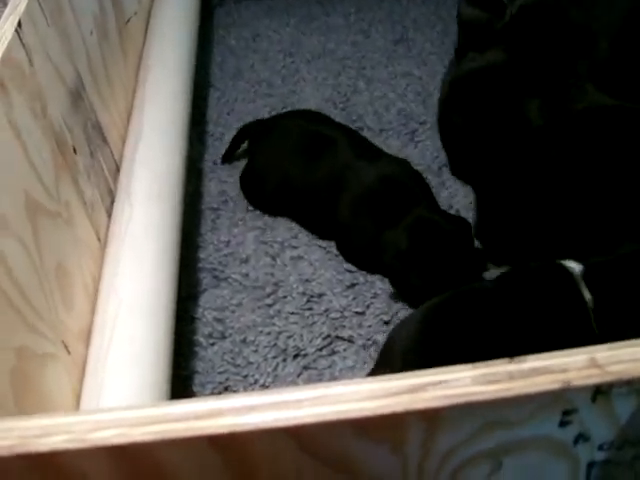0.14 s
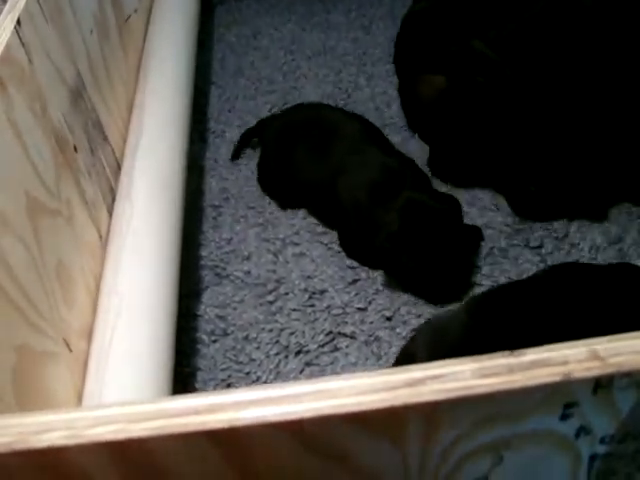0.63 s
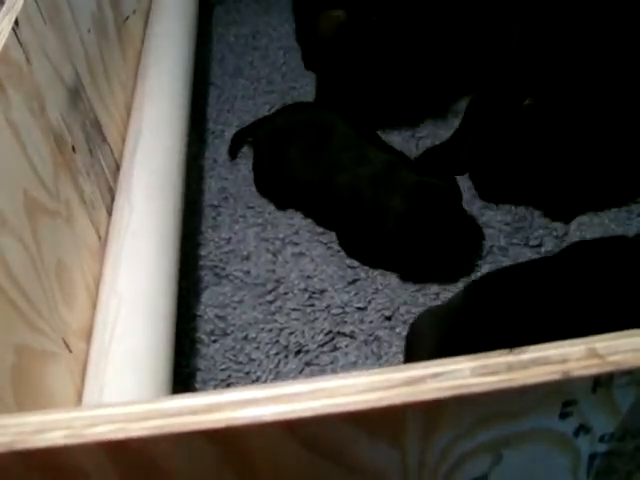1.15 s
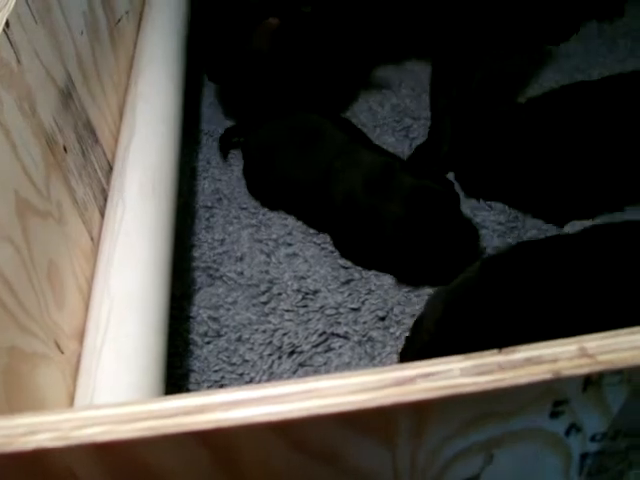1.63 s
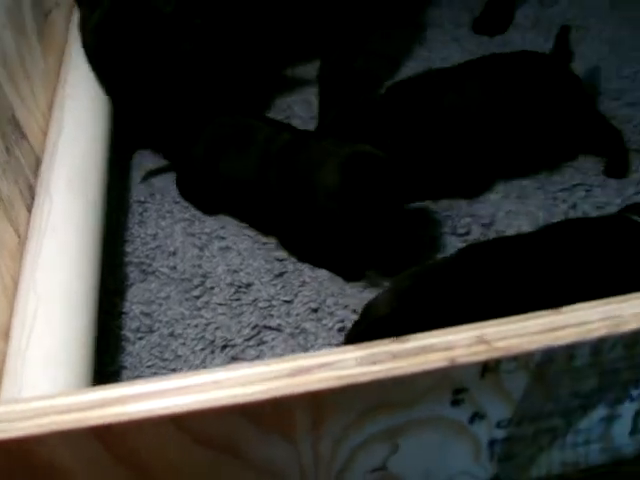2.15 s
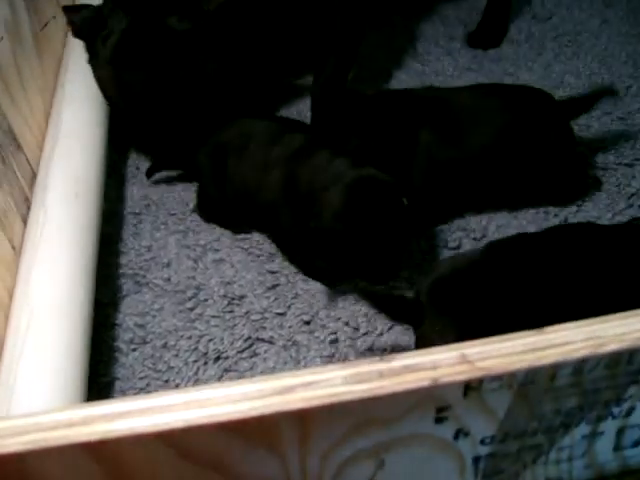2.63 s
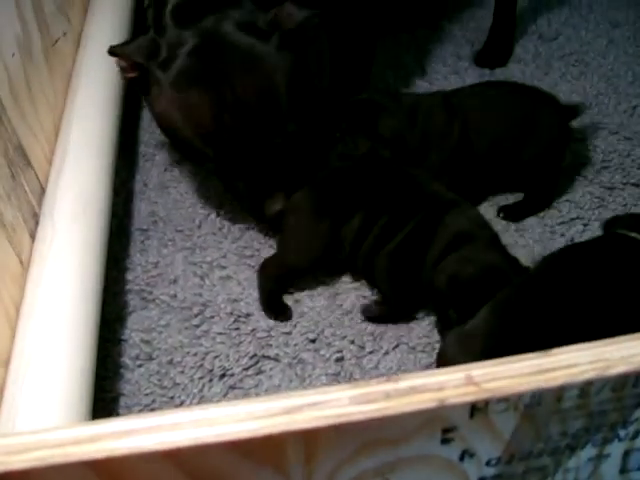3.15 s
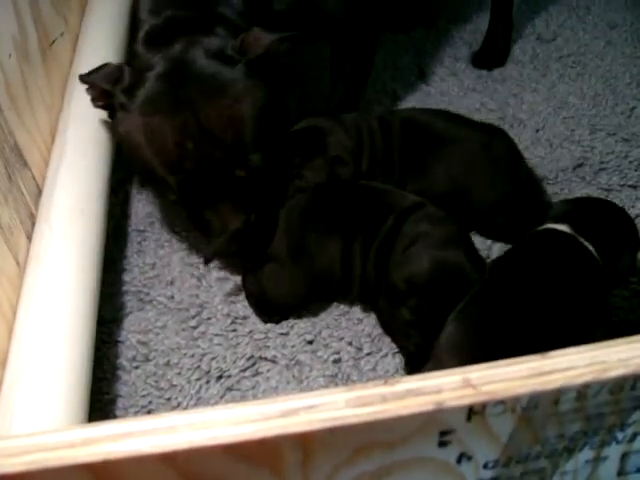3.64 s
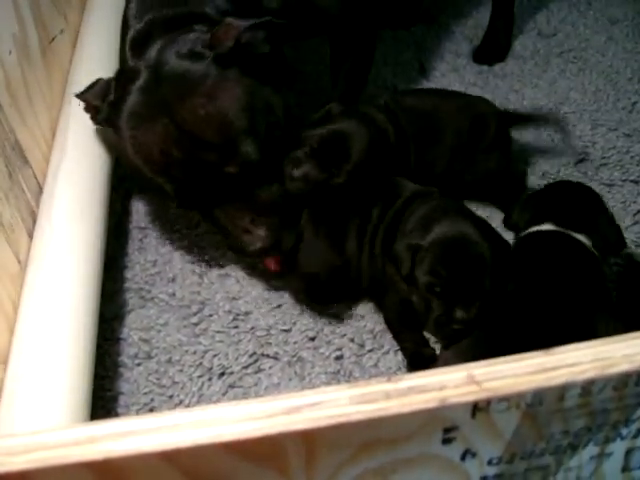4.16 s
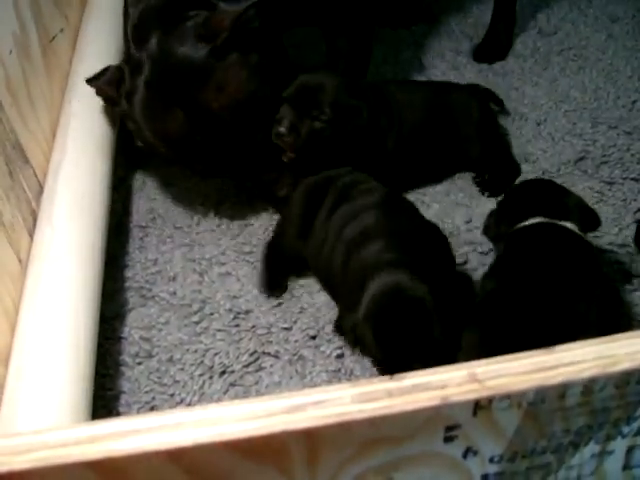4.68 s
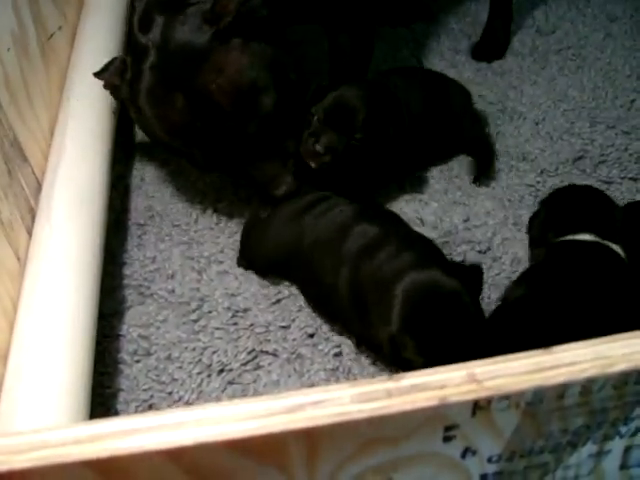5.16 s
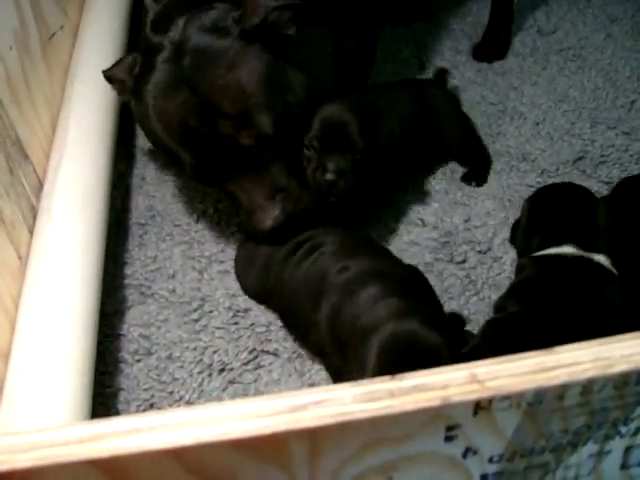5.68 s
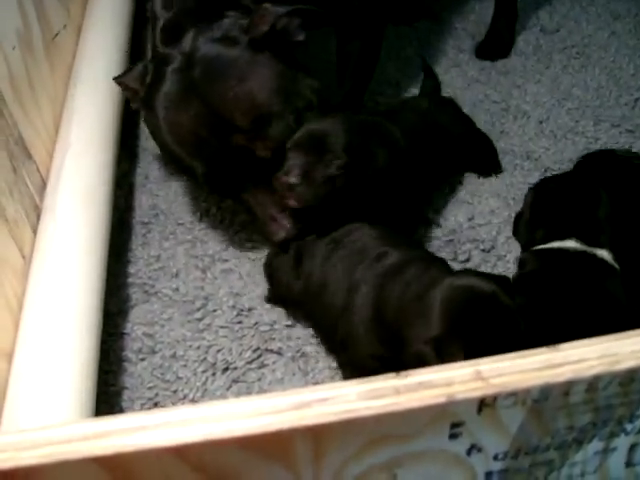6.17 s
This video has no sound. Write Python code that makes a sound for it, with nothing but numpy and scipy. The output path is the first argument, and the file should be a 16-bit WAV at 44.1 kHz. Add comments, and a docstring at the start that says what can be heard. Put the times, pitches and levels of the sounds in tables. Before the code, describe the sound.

Loud low booming drone from outside, sinking at midpoint, over camera hiss and thin whine; small puppies shuffle, snuffle and knock against a wooden pen.

```python
"""Puppies shuffle, snuffle, wheeze and whimper on a rug in a plywood pen: grainy noise through resonances,
gliding hums for the whimpers, and short blows on board modes for claws and smacks.
Outside a heavy vehicle pulls away: sine orders of its firing rate boom in the room, swell, fade and drop
at a gear change, over a low noise of road and engine.
The camera adds a thin whine that pauses and slips at every frame, steady tones, a hiss and an offset."""
import sys
import numpy as np
from scipy import signal
from scipy.io import wavfile
from scipy.ndimage import uniform_filter1d

SR = 44100
rng = np.random.default_rng(int(sys.argv[2]) if len(sys.argv) > 2 else 0)


def store_wav(level_fs):
    """Save 16-bit WAV to argv[1]."""
    pcm = np.round(np.clip(np.atleast_2d(level_fs), -1, 1) * 32767)
    wavfile.write(sys.argv[1], SR, pcm.T.astype(np.int16))


def magnitude_from_level(level_db):
    """Linear magnitude for a level in decibels (20 dB per decade)."""
    exponent = np.asarray(level_db, float) / 20
    return 10 ** exponent


N = 277828
T = np.arange(N) / SR  # s

# camera hiss, relative spectrum: f/Hz, level/dB per Hz
HISS_SPECTRUM = [(530, -40), (900, -3.5), (1190, -7.5), (1360, -8.5), (2060, -13), (5350, -14.5),
                 (5970, -15), (7180, -14), (7420, -14), (7920, -16), (8270, -16.5), (10700, -18.5),
                 (12100, -39), (15700, -73), (22000, -120)]
# slip of the whine at each frame, set by the exposure: from t/s, share/periods (nan = random at each frame)
WHINE_SLIPS = [(0, .05), (.14, .225), (.42, -.49), (.69, .055), (.97, .265), (1.25, -.29), (1.49, .215),
               (1.98, -.34), (2.22, np.nan), (2.43, .03), (2.56, np.nan), (2.8, -.26), (3.05, -.035),
               (3.36, -.21), (3.39, .253)]
# faint steady camera tones: f/Hz, level/dB
STEADY_TONES = [(436, -59), (5200, -78), (6630, -76), (7864.3, -60)]

# road and engine roar through the walls, relative spectrum: f/Hz, level/dB per Hz
ROAR_SPECTRUM = [(12, -34), (20, -12), (30, -14), (43, -18.5), (70, -13.5), (93, -15), (114, -21.5),
                 (134, -19.5), (170, -19), (217, -22.5), (260, -21.5), (487, -29), (659, -24), (1070, -42),
                 (2500, -50), (3250, -87), (5500, -120)]
# roar before its rumble cut: t/s, level/dB
ROAR_CURVE = [(0.0, -33.5), (0.23, -36.5), (1.19, -38), (1.4, -40), (1.72, -39.5), (3.44, -38), (4.03, -35),
              (4.33, -37.5), (4.76, -35), (5.26, -36.5), (5.65, -38.5), (6.3, -39)]

# engine speed as firing rate: t/s, f/Hz
FIRING_RATE = [(0, 80.1), (1, 82.5), (2, 84.8), (3, 86.3), (3.8, 86.3), (3.86, 83.4), (3.92, 76.6),
               (3.98, 70.2), (4.07, 65.5), (4.15, 61.8), (4.4, 61.5), (5, 62.2), (6.3, 63.7)]
# exhaust note in the room, before nulls and ringing: t/s, level/dB
NOTE_CURVE = [(0, -18.5), (.26, -18), (.5, -20), (.72, -25), (.92, -21), (1.2, -24), (1.55, -27),
              (1.82, -22.5), (2.09, -14.5), (2.42, -17.5), (2.9, -14.5), (3.04, -17), (3.35, -14.5),
              (3.63, -15.5), (3.78, -18.5), (3.86, -15), (4.0, -24), (4.2, -18.5), (4.4, -19), (4.8, -22),
              (5.3, -18), (5.7, -17.5), (6.0, -19), (6.3, -20.5)]
# second order of the firing rate: t/s, level/dB
SECOND_CURVE = [(0, -54), (.5, -46), (.67, -33.5), (.96, -52.5), (1.27, -40.5), (1.55, -42.5), (1.8, -32),
                (2.0, -36), (2.2, -41.5), (2.64, -35), (2.81, -42.5), (2.91, -38), (3.35, -47), (3.78, -42),
                (3.86, -35.5), (3.94, -40), (3.99, -29.5), (4.06, -34.5), (4.13, -40.5), (4.4, -35.5),
                (4.75, -37), (4.91, -52), (5.34, -46), (5.65, -36), (5.98, -50), (6.3, -39)]
# third order of the firing rate: t/s, level/dB
THIRD_CURVE = [(0, -53), (.8, -61), (1.1, -46), (1.35, -54), (1.7, -45.5), (1.95, -39), (2.1, -38),
               (2.38, -63), (2.75, -48), (3.35, -65), (3.76, -47.5), (4.0, -45), (4.2, -45), (4.45, -38.5),
               (4.8, -30), (4.95, -34.5), (5.3, -39), (5.58, -48.5), (5.9, -38), (6.3, -48.5)]
# faint high orders: multiple of the firing rate, level/dB in the first gear, level/dB in the next
UPPER_ORDERS = [(5, -56, -51.5), (10, -62, -57)]
# start and end of the high orders' level change between gears: t/s
GEAR_SHIFT = (3.85, 4.15)
# two paths of the note cancel and its phase turns half a cycle:
# t/s, half width/s, depth/dB, way of the turn (1 forward, -1 back)
PATH_NULLS = [(1.45, 0.079, -8.5, -1), (1.63, 0.11, -4.5, 1), (1.92, 0.1, -6, -1), (2.26, 0.086, -11, -1),
              (2.658, 0.15, -17.5, 1), (3.947, 0.042, -33, 1), (4.032, 0.023, -11, -1)]
# room mode that rings on after the gear change: f/Hz, width/Hz, level/dB
RINGING_MODE = (86, 1.3, -14)

# soft closed-mouth whimpers: start t/s, length/s, first f/Hz, last f/Hz, level/dB
WHIMPER_CALLS = [(0.493, 0.32, 376, 398, -48), (4.69, 0.1, 880, 771, -44), (4.834, 0.097, 752, 852, -47)]
# wheezy breaths: start t/s, length/s, nose level/dB, throat level/dB
BREATHS = [(1.77, 0.54, -58.5, -55.5), (2.257, 0.31, -62.5, -60), (4.416, 0.41, -62, -48),
           (4.785, .36, -60, -52)]
# nose resonances: f/Hz, width/Hz, level/dB
NOSE_MODES = [(1340, 140, 1), (2350, 500, 6)]
# throat resonance: f/Hz, width/Hz, level/dB
THROAT_MODES = [(845, 140, 0)]
# claws and smacks: t/s, peak level/dB, strongest f/Hz, fall away from it/dB per octave, t60/s
BLOWS = [(.077, -22, 985, 10, 0.072), (.084, -24, 2400, 5, 0.041), (.0868, -32, 7900, 30, 0.011),
         (.517, -34.5, 3300, 6, .015), (2.553, -38.5, 3000, 12, .015), (3.067, -10, 4630, 7, 0.024),
         (3.666, -39, 2300, 18, 0.023), (3.805, -46, 3100, 12, .02), (3.93, -42, 4000, 10, .015),
         (3.9615, -34, 2900, 31, 0.018), (4.332, -33.5, 1300, 12, 0.039), (4.572, -28, 1200, 3, 0.045),
         (4.8307, -33, 2300, 8, 0.032), (6.0004, -31, 996, 11, 0.079)]
# board modes, before the fall of each blow: f/Hz, width/Hz, level/dB
BOARD_MODES = [(873, 480, 10), (1300, 980, 7.5), (2040, 780, 2.5), (2400, 780, 3), (3170, 1100, 1.5),
               (3830, 790, 2.5), (5000, 1740, -7), (5760, 2800, -3), (7900, 800, -8)]
# fur, paws and snuffles on the rug:
# loudest t/s, rise/s, fall/s, level/dB, tilt/dB per octave, snout resonance f/Hz
MOVEMENTS = [(.045, .1, 0.081, -40, 2, 4030), (.12, .06, 0.048, -46, -6, 4000),
             (.93, 0.15, 0.18, -55, -8, 3520), (1.63, 0.043, 0.038, -54, 0, 4300),
             (1.86, 0.065, .1, -50.5, -14, 3400), (1.98, 0.13, 0.09, -54.5, 1, 4800),
             (3.668, 0.018, .05, -53, 0, 2500), (3.725, 0.047, .05, -52, 6, 3100),
             (3.805, 0.038, .16, -43.5, 6, 3100), (4.0, 0.14, 0.19, -42, -2.5, 2950),
             (4.12, 0.16, 0.11, -45, -4, 2760), (4.2, .05, .1, -57, -3, 2800),
             (5.325, 0.042, 0.063, -49, 4, 3560), (5.89, .06, 0.16, -54, -1, 3620),
             (6.0, 0.11, 0.17, -42.5, -7, 3360), (6.17, 0.12, 0.091, -51.5, -9, 3600)]
# pen resonances, before the tilt of each movement: f/Hz, width/Hz, level/dB
PEN_MODES = [(780, 250, 5.5), (1310, 440, 8), (2175, 450, 7.5), (2570, 200, 8), (3100, 210, 12.5),
             (4000, 1200, 4)]
# broad rustle of the rug's pile: f/Hz, width/Hz, level/dB
PILE_MODE = (2300, 4100, -.5)
# airy top of the fur: f/Hz, width/Hz, level/dB
AIR_MODES = [(4750, 840, 6), (6260, 770, 6), (7570, 920, 15.5)]


def evened(x):
    """Scales to rms 1."""
    return x / np.sqrt(np.mean(x ** 2) + 1e-20)


def curve(rows):
    """Joins the points of a two-column table by straight lines over the whole scene."""
    s, value = np.transpose(rows)
    return np.interp(T, s, value)


def placed(s, sound):
    """A silent track that holds the sound from second s."""
    out = np.zeros(N + len(sound))
    out[round(s * SR):][:len(sound)] = sound
    return out[:N]


def noise(spectrum, patchy_db):
    """Random short-time spectra with drifting patches, shaped by the spectrum, at rms 1."""
    hz = np.fft.rfftfreq(2048, 1 / SR)
    real, imaginary, patches = rng.standard_normal((N // 512 + 5, len(hz), 3)).T
    patches = uniform_filter1d(patches, size=10, axis=0)  # over frequency
    patches = evened(uniform_filter1d(patches, size=8, axis=1))  # over time
    f, db = np.transpose(spectrum)
    shape_db = np.interp(np.log(hz + 1), np.log(f + 1), db)[:, None] + patchy_db * patches
    spectra = (real + 1j * imaginary) * magnitude_from_level(shape_db)
    return evened(signal.istft(spectra, nperseg=2048, noverlap=1536)[1][:N])


def grainy(grain_db, count=1):
    """Noises whose level jitters together every few milliseconds."""
    grain = evened(uniform_filter1d(rng.standard_normal(N), size=150))
    return rng.standard_normal((count, N)) * magnitude_from_level(grain_db * grain)


def resonate(x, hz, width, order=1):
    """Shifts hz down to zero, smooths, and shifts back: a resonance of gain 1."""
    turn = np.exp(2j * np.pi * np.cumsum(hz * np.ones(len(x))) / SR)
    r = np.exp(-np.pi * width / SR)
    low = x / turn
    for _ in range(order):
        low = signal.lfilter([1 - r], [1, -r], low)
    return 2 * (turn * low).real


def body(drive, modes, tilt=0):
    """Rings steep resonances side by side; tilt, in dB per octave, pivots at 3 kHz."""
    return sum(magnitude_from_level(db + tilt * np.log2(hz / 3000)) * resonate(drive, hz, width, order=2)
               for hz, width, db in modes)


def hiss():
    """Steady camera hiss: noise with a slightly patchy spectrum."""
    hiss_db = -52
    return magnitude_from_level(hiss_db) * noise(HISS_SPECTRUM, patchy_db=1.0)


def camera_whine():
    """The line-scan whine pauses and slips in phase at each frame; steady tones lie under it."""
    whine_hz, whine_db, pause_s = 7704.3, -45.5, 0.0007
    frame_s, first_frame_s = .0346186, .0167
    frames = np.arange(first_frame_s, N / SR, frame_s)
    since, share = np.transpose(WHINE_SLIPS)
    slip = share[np.searchsorted(since, frames) - 1]
    slip = np.where(np.isnan(slip), rng.random(len(frames)), slip)
    slipped = np.r_[0, np.cumsum(slip)][np.searchsorted(frames, T)]
    # signed time from the nearest frame start
    from_frame = (T - first_frame_s + frame_s / 2) % frame_s - frame_s / 2
    running = 1 - np.exp(-(from_frame / pause_s * 2) ** 2)
    whine = magnitude_from_level(whine_db) * running * np.sin(2 * np.pi * (whine_hz * T + slipped))
    tones = sum(magnitude_from_level(db) * np.sin(2 * np.pi * hz * T) for hz, db in STEADY_TONES)
    return np.sqrt(2) * (whine + tones)


def roar():
    """Low, lumpy noise of road and engine, with the deepest rumble cut."""
    rumble_cut_hz = 55
    road = magnitude_from_level(curve(ROAR_CURVE)) * noise(ROAR_SPECTRUM, patchy_db=0.5)
    return signal.sosfilt(signal.butter(2, rumble_cut_hz, "high", fs=SR, output="sos"), road)


def exhaust():
    """Clean orders of the firing rate; the first sinks and turns at each null; one room mode rings along."""
    firing = 2 * np.pi * np.cumsum(curve(FIRING_RATE)) / SR
    paths = np.ones(N, complex)
    for s, half, db, way in PATH_NULLS:
        passed = np.tanh((T - s) / half)
        paths *= passed - 1j * np.sign(way) * magnitude_from_level(db) * np.sqrt(1 - passed ** 2)
    note = magnitude_from_level(curve(NOTE_CURVE)) * (paths * np.exp(1j * firing)).imag
    note += magnitude_from_level(curve(SECOND_CURVE)) * np.sin(2 * firing)
    note += magnitude_from_level(curve(THIRD_CURVE)) * np.sin(3 * firing)
    for multiple, *gear_db in UPPER_ORDERS:
        note += magnitude_from_level(np.interp(T, GEAR_SHIFT, gear_db)) * np.sin(multiple * firing)
    mode_hz, width, mode_db = RINGING_MODE
    return np.sqrt(2) * (note + magnitude_from_level(mode_db) * resonate(note, mode_hz, width))


def whimper(row, shake):
    """A gliding hum with an unsteady pitch."""
    s, length, first_hz, last_hz, db = row
    glide_hz = np.linspace(first_hz, last_hz, round(length * SR))
    hz = glide_hz * (1 + 0.034 * shake[round(s * SR):][:len(glide_hz)])
    hum = np.sin(2 * np.pi * np.cumsum(hz) / SR)
    return placed(s, np.sqrt(2) * magnitude_from_level(db) * hum * signal.windows.tukey(len(hz), .7))


def wheeze(row, drive):
    """One long breath: grainy air noise through nose and throat resonances."""
    s, length, nose_db, throat_db = row
    part = drive[round(s * SR):][:round(length * SR)]
    nose = magnitude_from_level(nose_db) * evened(body(part, NOSE_MODES))
    throat = magnitude_from_level(throat_db) * evened(body(part, THROAT_MODES))
    return placed(s, (nose + throat) * signal.windows.tukey(len(part), .4))


def tap(row, rattle):
    """A snap and its dying rattle ring damped board modes, strongest near the blow's own pitch."""
    s, db, centre_hz, fall_db, t60 = row
    blow = magnitude_from_level(-19.5 - 60 * np.arange(len(rattle)) / SR / t60) * rattle
    blow[0] = 1  # the snap
    modes = [(hz, width, mode_db - fall_db * abs(np.log2(hz / centre_hz)))
             for hz, width, mode_db in BOARD_MODES]
    ring = body(blow, modes)
    ring += body(blow, [(centre_hz, 0.79 * centre_hz, -11.5)])  # the blow heard directly
    return placed(s, magnitude_from_level(db) * ring / abs(ring).max())


def shuffle(row, *drives):
    """One movement swells and dies: rubbing rings pen and pile, a snout adds a band, fur an airy top."""
    s, rise, fall, db, tilt, snout_hz = row
    ends_db, rounding = -17.5, 1.47  # drop at both ends; power of time that rounds the top
    snout_width_hz, snout_db = 680, 6
    air_db, air_per_tilt = -6, 0.35  # the airy top grows with the tilt
    from_top = np.where(T < s, (s - T) / rise, (T - s) / fall)
    swell_db = db + ends_db * from_top ** rounding
    on = np.flatnonzero(swell_db > db + ends_db)
    paws, pile, snout = (drive[on] for drive in drives)
    rub = body(paws, PEN_MODES, tilt) + body(pile, [PILE_MODE])
    rub += body(snout, [(snout_hz, snout_width_hz, snout_db)])
    air = magnitude_from_level(air_db + air_per_tilt * tilt) * evened(body(paws, AIR_MODES))
    return placed(T[on[0]], magnitude_from_level(swell_db[on]) * (evened(rub) + air))


def scene():
    """Vehicle outside, puppies in the pen."""
    vehicle = roar() + exhaust()
    shake = evened(uniform_filter1d(rng.standard_normal(N), size=900))
    puff = grainy(grain_db=2.5)[0]
    voices = sum(whimper(row, shake) for row in WHIMPER_CALLS)
    voices += sum(wheeze(row, puff) for row in BREATHS)
    taps = sum(map(tap, BLOWS, rng.standard_normal((len(BLOWS), 4000))))
    moves = sum(shuffle(row, *grainy(grain_db=1.5, count=3)) for row in MOVEMENTS)
    return (vehicle + voices + taps + moves)[None]


def band_limit(x):
    """A steep low-pass at the top of the band."""
    return signal.sosfilt(signal.butter(12, 12250, fs=SR, output="sos"), x)


def record(dry):
    """The input dulls scene and whine above its port, adds hiss, limits the band and shifts the zero line."""
    port_hz, edge_hz, offset = 8500, 20000, -.0655
    dulled = signal.sosfilt(signal.butter(3, port_hz, fs=SR, output="sos"), dry + camera_whine())
    limited = signal.sosfilt(signal.butter(10, edge_hz, fs=SR, output="sos"), dulled + hiss())
    return band_limit(limited + offset)


dry = scene()
out = record(dry)
store_wav(out)
```